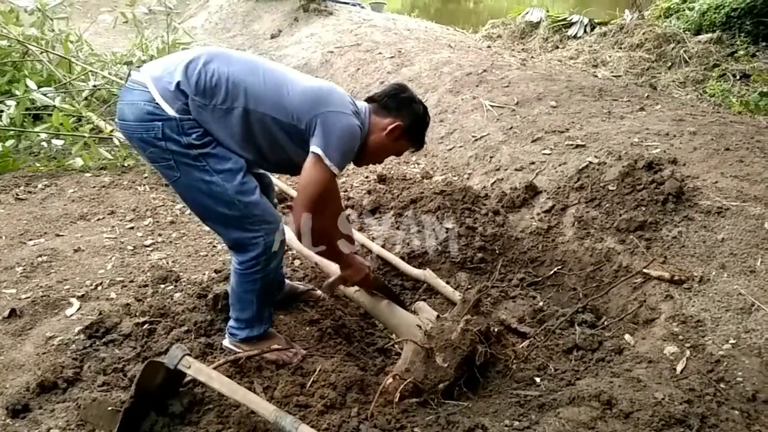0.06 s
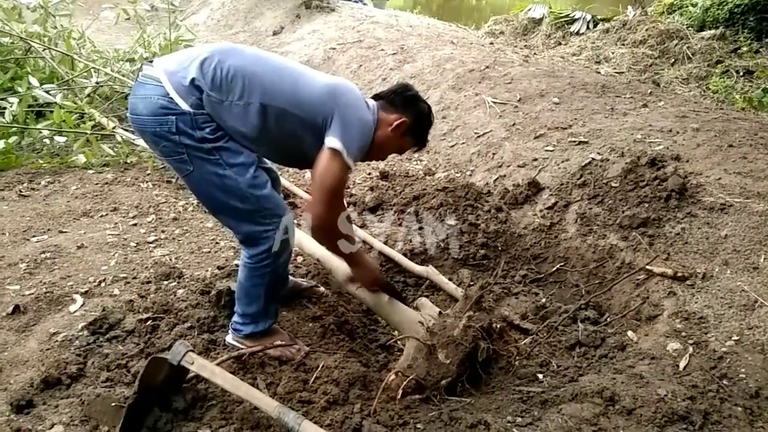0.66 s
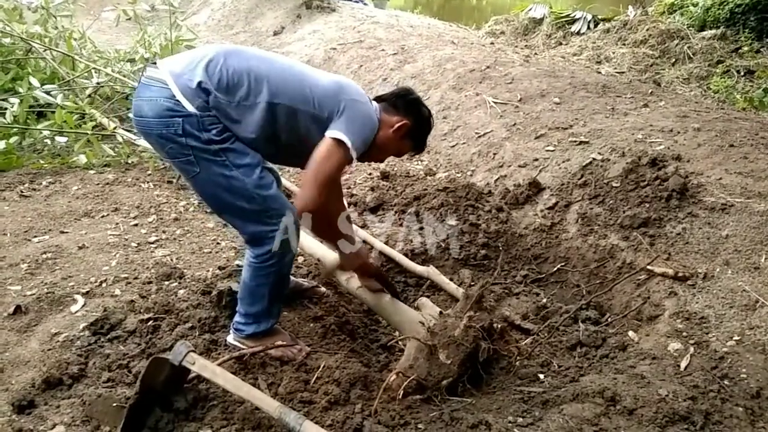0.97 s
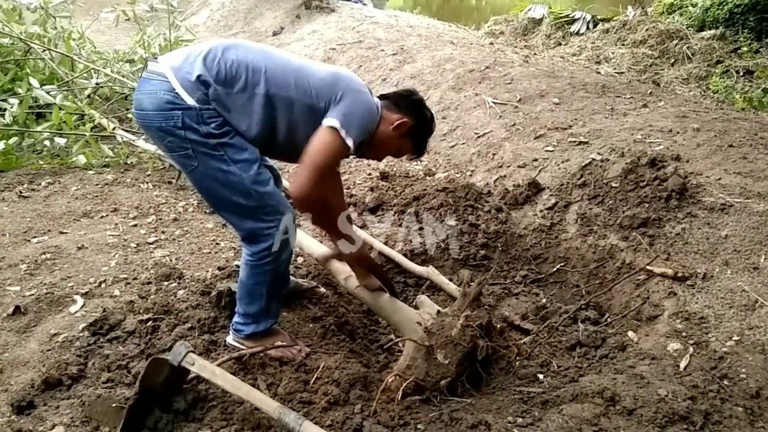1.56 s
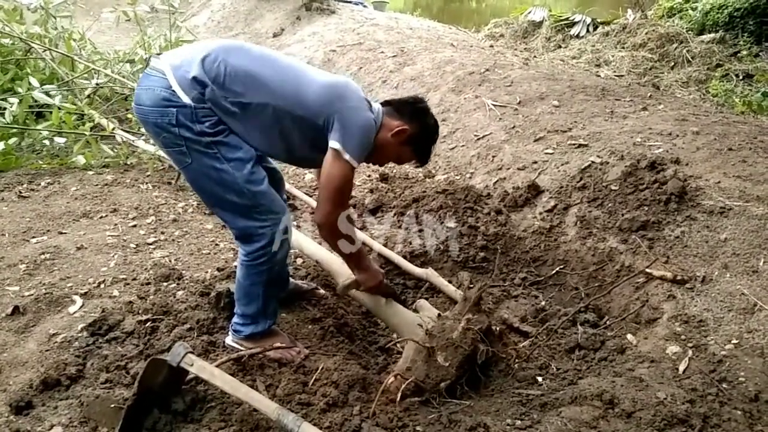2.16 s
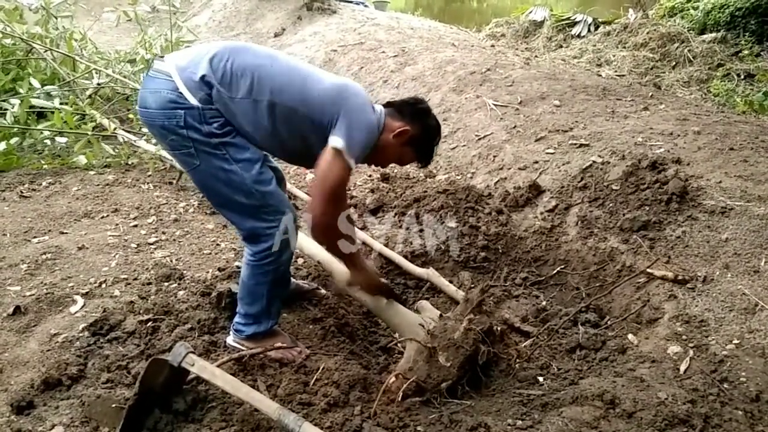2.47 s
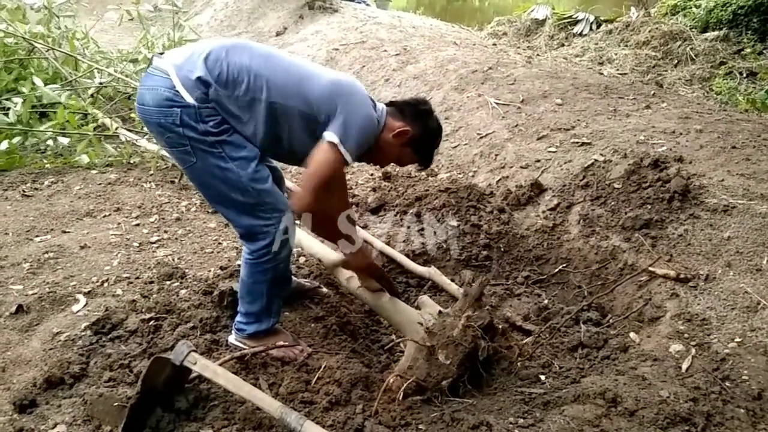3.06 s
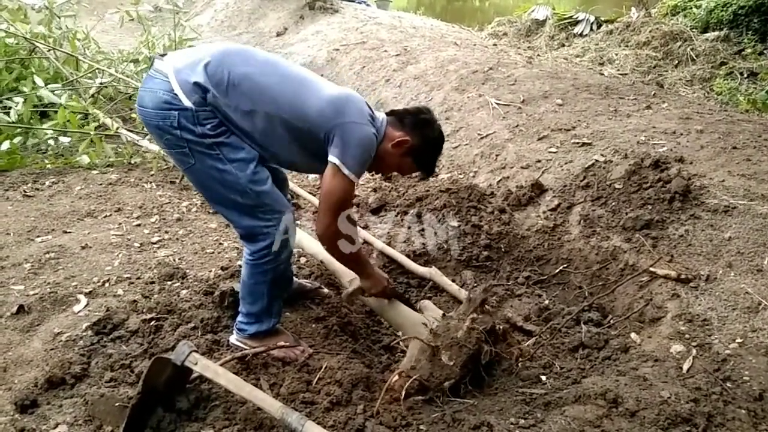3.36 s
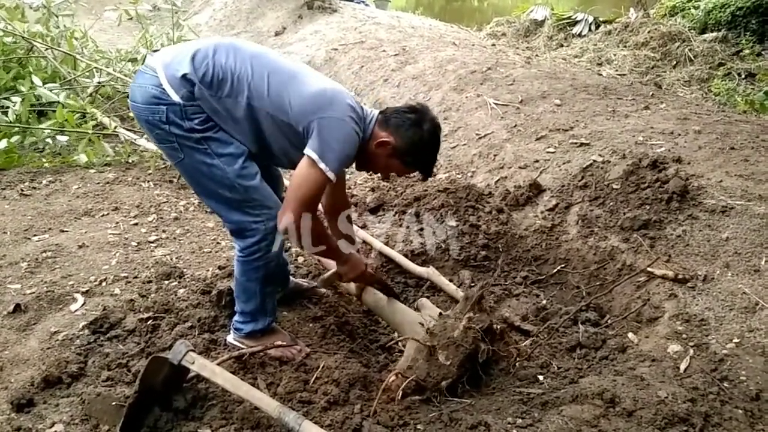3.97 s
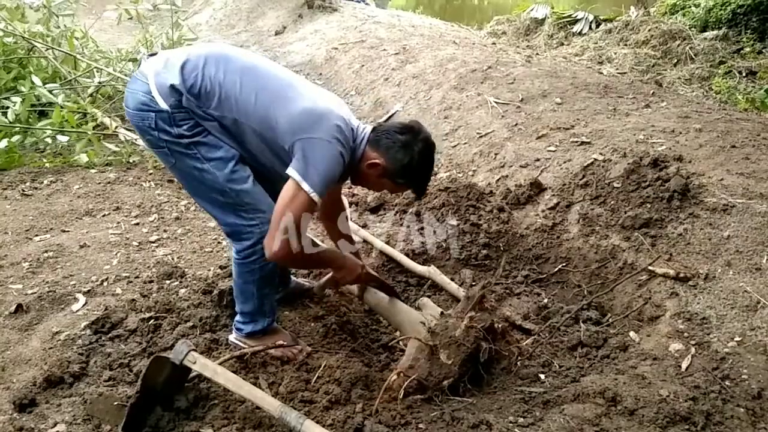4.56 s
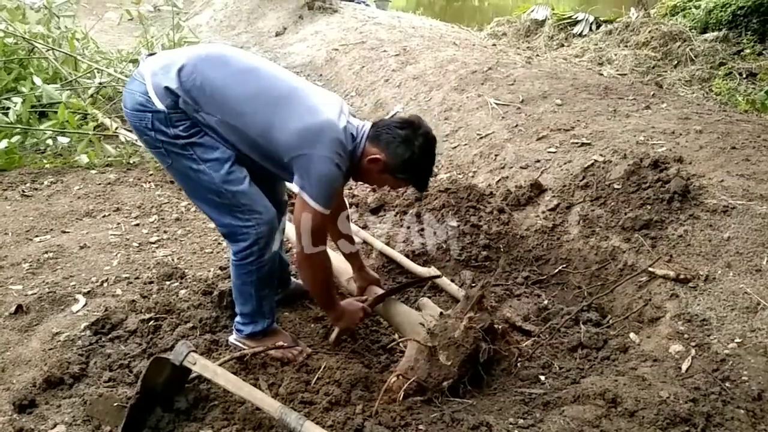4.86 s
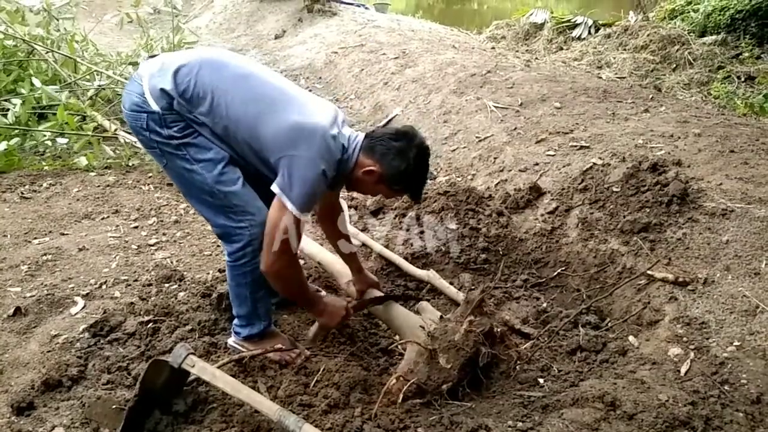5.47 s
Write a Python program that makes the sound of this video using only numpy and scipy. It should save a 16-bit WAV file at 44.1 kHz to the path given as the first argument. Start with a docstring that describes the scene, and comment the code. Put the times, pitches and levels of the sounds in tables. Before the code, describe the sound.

Close by, a hand saw rasps back and forth through a woody root, about five strokes a second, its blade hissing and now and then jolting the wood. A little past halfway the sawing falters, leaving a handful of short, scattered scrapes. The open countryside around it holds a low wind rumble, a farther bird repeating an upward whistle, and very faint insects and distant calls.

```python
"""Hand saw through a root

A hand saw cuts a thick root outdoors: quick push and return strokes, then a few hesitant ones.
The teeth hiss on the steel blade, tear rasping fibres and shake the root; earth banks echo faintly.
Wind rumbles low, a bird whistles upward, and insects, far-off calls and a faint tick fill the pauses."""
import sys
import numpy as np
from scipy import signal
from scipy.fft import rfft, irfft
from scipy.io import wavfile
from scipy.ndimage import uniform_filter1d, map_coordinates

SR = 44100
rng = np.random.default_rng(int(sys.argv[2]) if len(sys.argv) > 2 else 0)


def put_to_file(sound):
    """Save the sound as 16-bit audio at rate SR, in the file named by the first command-line argument."""
    columns = np.atleast_2d(sound).T  # one column per channel
    safe = np.clip(columns, -1, 1)
    whole_steps = np.round(safe * 32767)
    wavfile.write(sys.argv[1], SR, whole_steps.astype(np.int16))


N = 248283
TIME = np.arange(N) / SR
FREQS = np.fft.rfftfreq(N, 1 / SR)

# Tone of still air. Each row: frequency in Hz, relative level in dB.
AIR_SPECTRUM = [(100, -11.5), (450, 4), (750, 0.5), (1000, 2.5), (2000, 5), (2350, -6.5), (2700, -10.5),
                (8000, -10.5), (10000, 0.5), (11000, -22), (15000, -22)]
# Distant chorus of small animals. Each row: pitch in Hz, width in Hz, relative level in dB.
CHORUS_BANDS = [(1422, 116, -79.5), (1549, 98, -78), (1750, 130, -79.5), (1918, 71, -78), (2224, 90, -86.5),
                (4860, 280, -89.5), (9400, 440, -92)]
# The chorus swells and fades. Each row: time in seconds, gain in dB.
CHORUS_SWELL = [(0, 3), (1, 7.5), (2.5, 7.5), (3.7, 3.5), (4.2, -1.5), (4.7, -1.5), (5.1, -9), (5.6, -12)]
# Two chirring insects. Each row: pitch in Hz, width in Hz, relative level in dB.
INSECT_BANDS = [(9020, 59, -74.5), (9590, 70, -75)]
# The insects swell and fade. Each row: time in seconds, gain in dB.
INSECT_SWELL = [(0, -1), (.6, 4.5), (1.2, 2.5), (2.0, -1), (2.6, -18), (4.0, -24), (5.6, -11)]
# Thin far-off calls and one faint, short tick.
# Each row: centre and length in seconds, pitch and width in Hz, level in dB.
CALLS_AND_TICK = [(3.63, .14, 1340, 90, -66), (4.12, .06, 580, 90, -70), (4.17, .28, 8500, 350, -72),
                  (4.18, .12, 10200, 180, -80), (4.19, .05, 4950, 400, -75), (4.21, .17, 2220, 70, -74),
                  (4.27, .17, 965, 70, -76), (4.3, .45, 1570, 80, -71), (4.63, .07, 2220, 70, -72),
                  (4.92, .18, 1377, 35, -68), (4.98, .2, 4810, 90, -78), (5.07, .17, 8450, 300, -71),
                  (5.26, .09, 1000, 120, -77), (5.3, .6, 1530, 90, -75), (5.56, .12, 9500, 140, -78)]

# Tone of the wind's rumble. Each row: frequency in Hz, relative level in dB.
RUMBLE_SPECTRUM = [(8, -50), (20, -29), (33, -20.5), (50, -2), (70, 1.5), (88, 6), (110, 1), (150, -7),
                   (200, -19), (240, -32), (310, -40), (420, -43), (700, -50), (1500, -64)]
# Strength of the wind. Each row: time in seconds, relative level in dB.
GUSTS = [(0.0, -48), (1.05, -48), (1.35, -56), (1.5, -46), (1.57, -54), (1.72, -45), (2.1, -60),
         (2.17, -49), (2.39, -64), (2.54, -51), (2.69, -50), (2.92, -65), (2.99, -55), (3.22, -50),
         (3.37, -55), (3.59, -45), (3.74, -54), (4.34, -48), (4.49, -50), (5.16, -45), (5.39, -63),
         (5.61, -63)]
# Swell of the upper rumble. Each row: time in seconds, relative level in dB.
UPPER_RUMBLE_SWELL = [(0.0, -46), (0.37, -52), (0.97, -52.5), (1.35, -57), (1.5, -41), (1.57, -55),
                      (1.8, -42.5), (1.87, -58.5), (2.1, -62.5), (2.62, -62.5), (2.92, -76), (2.99, -62),
                      (3.29, -76), (3.67, -58), (3.74, -66), (4.19, -74), (4.34, -56), (4.56, -63),
                      (5.01, -63.5), (5.61, -69.5)]
# Swell of the soft lumps above the rumble. Each row: time in seconds, relative level in dB.
LUMP_SWELL = [(0.0, -76), (0.75, -65.5), (0.9, -96), (1.2, -79), (1.27, -67.5), (1.95, -65), (2.17, -85),
              (2.69, -69.5), (2.84, -80), (3.37, -80), (3.59, -71), (3.67, -87), (3.82, -73), (3.97, -88),
              (4.19, -70.5), (4.49, -90), (4.71, -66.5), (5.61, -83)]
# Bird whistles. Each row: start and length in seconds, first and last pitch in Hz, relative level in dB.
WHISTLES = [(1.984, 0.17, 3660, 5460, -57), (2.824, 0.135, 3640, 5026, -53.5),
            (3.685, 0.17, 3634, 5385, -54), (4.631, 0.18, 3546, 5150, -64)]
# Echo of the banks. Each row: frequency in Hz, seconds to die away by 60 dB.
BANK_DECAY = [(300, 0.04), (1400, 0.62), (4000, 0.35), (8000, 0.33), (14000, 0.29)]

# Saw strokes, light returns and deep cuts in turn. Each row: start and length in seconds, relative
# blade hiss and wood bite in dB, where in the stroke the teeth dig deepest (0-1), size of the dig in dB.
STROKES = [ (.006, 0.15, -51.5, -59.5, 0.85, 5.5), (0.163, 0.16, -48, -63, 0.72, 2.5),
           (0.333, 0.15, -46, -52, 0.86, 6.5), (.503, .16, -48, -53.5, 0.61, 2.5),
           (0.695, .14, -48.5, -48, 0.68, 6), (0.859, 0.16, -47, -49, 0.53, -1),
           (1.034, 0.15, -47.5, -48, 0.71, 5.5), (1.212, .16, -48, -47.5, 0.63, 1),
           (1.384, .14, -48, -48, 0.82, 5), (1.561, 0.16, -49, -50, 0.68, 1),
           (1.741, 0.15, -49, -49, 0.75, 3.5), (1.916, 0.17, -49.5, -50.5, 0.64, 2.5),
           (2.112, .14, -49.5, -50, 0.85, 5), (2.288, 0.18, -51, -53, 0.61, 2.5),
           (2.493, 0.13, -48, -53.5, 0.87, 9), (2.671, 0.17, -50, -51, 0.66, -1),
           (2.874, 0.14, -48.5, -52.5, 0.85, 9.5), (3.087, 0.17, -50, -51.5, .8, 0.5),
           (3.299, 0.14, -50, -54.5, 0.85, 11.5), (3.855, .13, -54, -65, 0.27, 2),
           (4.449, 0.11, -77, -74, 0.31, -2), (4.683, .124, -48, -54.5, 0.75, 9.5),
           (5.082, 0.13, -55.5, -63.5, 0.39, 3), (5.332, .084, -70, -97, 0.77, 17.5)]
# The blade snags and jolts the root. Each row: start in seconds, level in dB.
JOLTS = [(.405, -55.5), (.44, -55.5), (.61, -59), (.715, -63), (.755, -54), (.79, -56), (.955, -61.5),
         (1.075, -62), (1.255, -81), (1.32, -75), (1.49, -59), (1.68, -57.5), (1.99, -57.5), (2.03, -66),
         (2.14, -64), (2.22, -55.5), (2.36, -59.5), (2.4, -66), (2.535, -64), (2.595, -64), (2.76, -74),
         (2.97, -70), (3.23, -66), (3.37, -70), (3.4, -58.5), (3.905, -63.5), (4.01, -67), (4.435, -66),
         (4.738, -52), (4.772, -62)]
# Body resonances of the root. Each row: frequency in Hz, width in Hz, relative level in dB.
ROOT_MODES = [(187, 64, 4.5), (295, 140, 3.5), (513, 380, -15.5), (544, 102, 10), (724, 146, 1),
              (772, 59, 0)]
# The root's hollow note shifts as the cut opens. Each row: time in seconds, pitch in Hz.
HOLLOW_NOTE = [(0, 593), (.45, 592), (.75, 730), (.85, 726), (1.05, 608), (1.7, 610), (2.2, 525),
               (2.4, 690), (3.0, 603), (3.9, 583), (4.75, 723), (5.6, 614)]
# Tone of the fibres under the teeth. Each row: frequency in Hz, relative level in dB.
FIBRE_SPECTRUM = [(300, -26), (700, -10.5), (870, -10.5), (1100, 5.5), (1380, 6.5), (1750, -11), (2050, -8),
                  (2330, 1), (2650, -5), (3100, -4.5), (5000, -1), (9000, -16.5), (15000, -25)]
# Tone of the saw's hiss. Each row: frequency in Hz, relative level in dB.
HISS_SPECTRUM = [(400, -45.5), (1000, -21), (1500, -5), (2400, -3.5), (2900, -13), (4100, -2), (5000, -1.5),
                 (7600, -3), (8900, -4.5), (9250, -26), (10000, -17.5), (10500, -4.5), (13000, -14),
                 (15500, -28)]
# Resonances of the blade. Each row: frequency in Hz, width in Hz, lift in dB.
BLADE_MODES = [(2357, 230, 7), (3090, 120, 8.9), (4250, 310, 4.2), (4822, 330, 6.7), (5134, 170, 7.9),
               (5360, 44, 1.5), (6160, 240, 6.5), (6870, 610, 5.6), (7506, 310, 6.7), (7860, 340, 2.6),
               (8250, 240, 5.9), (8790, 44, 5.2), (10130, 570, 1.3)]
# Ring of the blade while loose in the cut. Each row: frequency in Hz, width in Hz, relative level in dB.
LOOSE_MODES = [(3650, 170, -8.5), (4150, 82, -7.5), (4950, 110, -2.5), (6180, 300, -3.5), (7400, 290, -0.5),
               (8660, 65, -15.5), (11300, 500, -10.5)]


def gain_of(db):
    """Decibels to amplitude."""
    return 10 ** (np.asarray(db) / 20)


def unit_rms(x):
    """Scales to rms 1."""
    return x / np.sqrt(np.mean(x ** 2) + 1e-20)


def fader(curve, extra_db=0):
    """Gain over time along a curve of (seconds, dB)."""
    return gain_of(np.interp(TIME, *np.transpose(curve)) + extra_db)


def value_at(points, hz):
    """Reads a table on a log-frequency axis."""
    point_hz, value = np.transpose(points)
    return np.interp(np.log(hz + 1), np.log(point_hz + 1), value)


def colour(x, db):
    """Minimum-phase EQ with the curve db over FREQS; the result has rms 1."""
    cepstrum = irfft(np.log(gain_of(np.maximum(db, db.max() - 100))), N)
    cepstrum[1:N // 2] *= 2
    cepstrum[N // 2:] = 0
    return unit_rms(irfft(rfft(x) * np.exp(rfft(cepstrum)), N))


def bell(hz, width):
    """A bell curve over FREQS, one half at the ends of its width."""
    return .5 ** ((2 * (FREQS - hz) / width) ** 2)


def noise_band(hz, width):
    """A fuzzy tone of narrow noise, rms 1."""
    return unit_rms(irfft(rfft(rng.standard_normal(N)) * bell(hz, width * np.sqrt(2)), N))


def drift(rate_hz):
    """A random wobble up to about rate_hz, rms 1."""
    return noise_band(0, 2 * rate_hz)


def resonate(x, hz, width):
    """A resonance of gain 1 that follows the pitch curve hz."""
    turn = np.exp(2j * np.pi * np.cumsum(hz) / SR)
    pole = np.exp(-np.pi * width / SR)
    return 2 * (turn * signal.lfilter([1 - pole], [1, -pole], x / turn)).real


def calls_and_tick():
    """Thin far-off calls and one faint, short tick: noise bands that each swell and fade once."""
    layer = np.zeros(N)
    for centre, length, hz, width, db in CALLS_AND_TICK:
        swell = np.cos(np.pi * np.clip((TIME - centre) / length, -.5, .5))
        tone = swell * noise_band(hz, width)
        layer += gain_of(db) * tone * np.linalg.norm(swell) / np.linalg.norm(tone)
    return layer


def animals(bands, flicker_db, flicker_hz):
    """Small animals chirr as narrow bands of noise, each flickering on its own."""
    return sum(gain_of(db + flicker_db * drift(flicker_hz)) * noise_band(hz, width)
               for hz, width, db in bands)


def countryside(air_db=-77):
    """The ambience bed: still air, a wavering chorus, insects, far-off calls and a tick."""
    air = gain_of(air_db) * colour(rng.standard_normal(N), value_at(AIR_SPECTRUM, FREQS))
    chorus = animals(CHORUS_BANDS, flicker_db=3.5, flicker_hz=15) * fader(CHORUS_SWELL)
    insects = animals(INSECT_BANDS, flicker_db=2, flicker_hz=9) * fader(INSECT_SWELL)
    return air + chorus + insects + calls_and_tick()


def wind(steadiness=.85, lumpiness_db=4):
    """A low rumble that follows the gusts, with soft lumps above it."""
    noise = colour(rng.standard_normal(N), value_at(RUMBLE_SPECTRUM, FREQS))
    power = uniform_filter1d(noise ** 2, size=5000)
    steadied = unit_rms(noise / power ** (steadiness / 2))  # compressed, so the gusts set the level
    rumble = steadied * fader(GUSTS, extra_db=-1)
    upper = noise_band(161, 66) * fader(UPPER_RUMBLE_SWELL, extra_db=-7)
    lumps = noise_band(295.3, 86) * fader(LUMP_SWELL, extra_db=-3)
    unevenness = gain_of(lumpiness_db * np.clip(drift(5.7), -2, 2))
    return rumble + upper + lumps * unevenness


def bank_echo(x, delay_s, echoes_per_s=3000):
    """Scattered echoes from earth and bushes, each band dying at its own speed."""
    taps = rng.standard_normal(SR) * (rng.random(SR) < echoes_per_s / SR) * (TIME[:SR] > delay_s)
    hz, t, cells = signal.stft(taps, SR, nperseg=256)
    decay = gain_of(-60 * t / value_at(BANK_DECAY, hz)[:, None])
    tail = signal.istft(cells * decay, SR, nperseg=256)[1]
    return signal.fftconvolve(x, tail / np.linalg.norm(tail))[:N]


def bird(arch=.65, waver=0.0072, flutter_db=3):
    """Fluttering whistles that climb fast at first, then more slowly."""
    song = np.zeros(N)
    wobble = 1 + waver * drift(263)
    for start, length, first_hz, last_hz, db in WHISTLES:
        progress = np.clip((TIME - start) / length, 0, 1)
        hz = (first_hz + (last_hz - first_hz) * progress ** arch) * wobble
        swell = np.sin(np.pi * progress ** 0.96)
        song += gain_of(db) * swell * np.sin(2 * np.pi * np.cumsum(hz) / SR)
    return song * unit_rms(gain_of(flutter_db * drift(60)))


def loose_blade(touch_db=-58, peak_s=0.037, width_s=0.026, follow=0.29):
    """As each stroke sets off, the still loose blade rings thinly in its own resonances."""
    ring = unit_rms(sum(gain_of(db) * noise_band(hz, width) for hz, width, db in LOOSE_MODES))
    typical_db = np.median([row[2] for row in STROKES])
    touch = np.zeros(N)
    for start, _, hiss_db, *_ in STROKES:
        swell = np.exp(-((TIME - start - peak_s) / width_s) ** 2)
        touch += gain_of(touch_db + follow * (hiss_db - typical_db)) * swell
    return ring * touch


def arm(late_peak=1.157, cruise=0.73, dig_in_s=0.03, let_go_s=0.023, lean_db=4):
    """Stroke progress (0-1) and three envelopes: the blade speeds up, digs in once and stops."""
    progress, hiss, bite, shudder = np.zeros((4, N))
    for start, length, hiss_db, bite_db, deepest, dig_db in STROKES:
        now = (TIME > start) & (TIME < start + length)
        along = (TIME[now] - start) / length
        swing = along ** late_peak  # the arm gathers speed slowly
        speed = np.tanh(cruise * np.sin(np.pi * swing)) / np.tanh(cruise)
        speed **= np.where(swing < .5, 1, .8)  # and stops short
        past_dig_s = (along - deepest) * length
        dig = dig_db * np.exp(-(past_dig_s / np.where(past_dig_s < 0, dig_in_s, let_go_s)) ** 2)
        wood_db = bite_db + lean_db * (along - .5)  # the arm leans in as the stroke goes on
        progress[now] = along
        # each layer grows as a power of speed; the fibres answer a dig more than the steel does
        hiss[now] += gain_of(hiss_db + dig) * speed ** 1.32
        bite[now] += gain_of(wood_db + 1.22 * dig) * speed ** 0.97
        shudder[now] += gain_of(wood_db - 27 + 0.65 * dig) * speed ** 0.53
    return progress, hiss, bite, shudder


def jolts(rise_s=0.005, fade_s=0.024):
    """The envelope of the snags: each jolts the root quickly and dies away."""
    envelope, t = np.zeros(N), TIME[:SR // 2]
    shape = np.minimum(t / rise_s, 1) * np.exp(-np.maximum(t - rise_s, 0) / fade_s)
    for start, db in JOLTS:
        part = envelope[round(start * SR):][:len(t)]
        part += gain_of(db) * shape[:len(part)]
    return envelope


def root(torn, judder_db=2, note_width_hz=110, note_share=0.83):
    """The heavy root answers the tearing unevenly, with one hollow note over its body."""
    body = sum(gain_of(db) / (1 + (1.73 * (FREQS - hz) / width) ** 2) ** 2
               for hz, width, db in ROOT_MODES)
    push = torn * gain_of(judder_db * drift(52.5))
    note_hz = np.interp(TIME, *np.transpose(HOLLOW_NOTE))
    note = resonate(push, note_hz, note_width_hz)
    note = unit_rms(resonate(note, note_hz, note_width_hz))  # a second pass narrows the note
    return unit_rms(colour(push, 20 * np.log10(body)) + note_share * note)


def tearing(teeth, spread_db, grip, snaps_per_s, snap_share):
    """Each tooth scrapes a burst of its own size, fading over grip tooth gaps; single fibres snap."""
    sizes = gain_of(spread_db * np.clip(rng.standard_normal(N), -2, 2))[teeth.astype(int)]
    scrape = sizes * np.exp(-(teeth % 1) / grip) * rng.standard_normal(N)
    snaps = rng.uniform(-0.9, 1, N) * (rng.random(N) < snaps_per_s / SR)
    return unit_rms(unit_rms(scrape) + snap_share * unit_rms(snaps))


def blade_reflections(x, speed, short_trip_s=.0026, long_trip_s=.005, wander_s=.0007725):
    """Waves run along the steel and bounce off the cut, whose place on the blade keeps moving."""
    shift_s = wander_s * np.tanh(drift(3.96)) * speed
    near = map_coordinates(x, [np.arange(N) - (short_trip_s + shift_s) * SR], order=3)
    far = map_coordinates(x, [np.arange(N) - (long_trip_s - shift_s) * SR], order=3)
    return unit_rms(x + 0.39 * near - 0.48 * far)


def steel(scrape, progress, pressure, scoop_db=-13, free_ring=1.09, first_hz=5600, last_hz=2300):
    """A skimming blade rings freely; pressed into the cut it is damped and sounds fuller."""
    tone_db = value_at(HISS_SPECTRUM, FREQS)
    modes_db = sum(db * bell(hz, width) for hz, width, db in BLADE_MODES)
    skimming = colour(scrape, tone_db + free_ring * modes_db + scoop_db * bell(2620, 1000))
    pressed = colour(scrape, tone_db + modes_db)
    ring = skimming + pressure * (pressed - skimming)
    # one broad resonance falls as the blade slides through the cut
    glide_hz = first_hz * (last_hz / first_hz) ** progress
    return unit_rms(ring + resonate(ring, glide_hz, width=600))


def saw(hiss_gain_db=2, bite_gain_db=-2, catch_db=1.16):
    """Teeth pass faster in mid-stroke and excite the steel, the fibres and the root."""
    progress, hiss, bite, shudder = arm()
    speed = np.sin(np.pi * progress)
    pressure = np.minimum(np.sqrt(bite / (hiss + 1e-9)), 1) * speed ** 2
    tooth_hz = (120 + 480 * speed) * np.exp(0.17 * drift(80))
    teeth = np.cumsum(tooth_hz) / SR  # count of teeth gone by
    scrape = tearing(teeth, spread_db=2.9, grip=2.7, snaps_per_s=600, snap_share=0.065)
    scrape = blade_reflections(scrape, speed)
    torn = tearing(teeth, spread_db=1.5, grip=0.42, snaps_per_s=400, snap_share=0.54)
    blade = gain_of(hiss_gain_db) * hiss * steel(scrape, progress, pressure)
    rasp = colour(blade_reflections(torn, speed), value_at(FIBRE_SPECTRUM, FREQS))
    fibres = gain_of(bite_gain_db) * bite * rasp
    catching = unit_rms(gain_of(catch_db * np.tanh(drift(130))))  # the blade catches and slips
    return catching * (blade + fibres) + (shudder + jolts()) * root(torn)


def scene(saw_echo_db=-15, bird_echo_db=-3, bird_direct_db=-2):
    """The mono mix: the near saw, the farther bird, their echoes and the background."""
    cut = saw() + loose_blade()
    song = bird()
    echo = gain_of(saw_echo_db) * bank_echo(cut, delay_s=0.022)
    echo += gain_of(bird_echo_db) * bank_echo(song, delay_s=0.0016)
    return (cut + gain_of(bird_direct_db) * song + echo + wind() + countryside())[None]


def suppress_noise(x, threshold_db=-104, depth_db=-5):
    """A mild noise suppressor turns down the weak cells of the short-time spectrum."""
    cells = signal.stft(x, SR, nperseg=1024, noverlap=768)[2]
    power = uniform_filter1d(abs(cells) ** 2, size=3, axis=-1)
    weakness = 1 / (1 + abs(power) / gain_of(threshold_db) ** 2)
    return signal.istft(cells * gain_of(depth_db * weakness), SR, nperseg=1024, noverlap=768)[1][:, :N]


def record(dry):
    """Noise suppression, then a steep cut of the highest treble."""
    lowpass = signal.firwin(511, cutoff=15600, window=("kaiser", 9), fs=SR)
    return signal.oaconvolve(suppress_noise(dry), lowpass[None], "same")


dry = scene()
out = record(dry)
put_to_file(out)
```